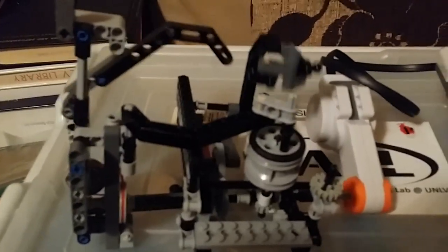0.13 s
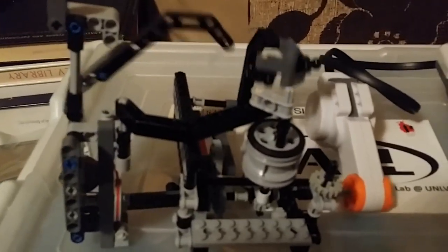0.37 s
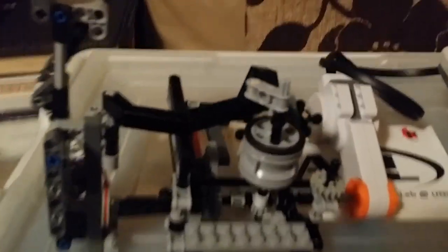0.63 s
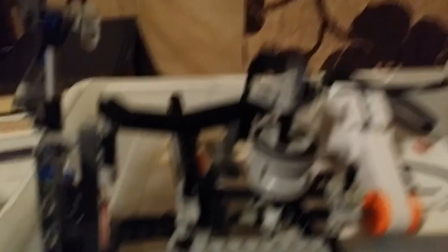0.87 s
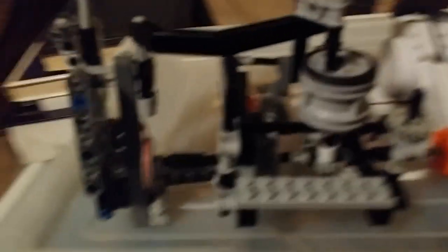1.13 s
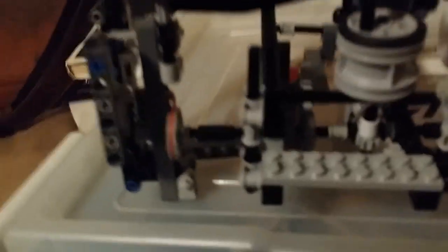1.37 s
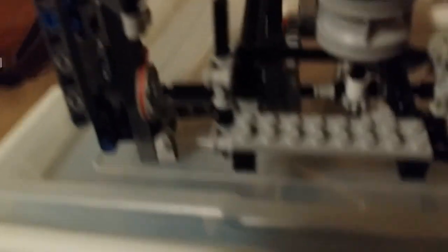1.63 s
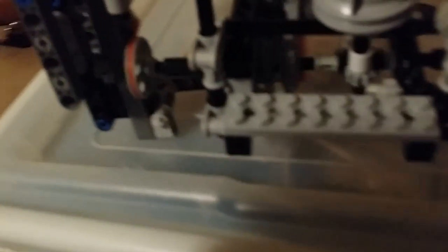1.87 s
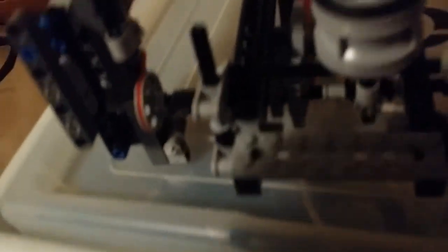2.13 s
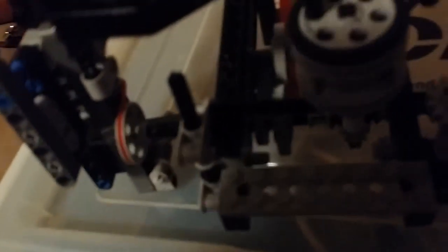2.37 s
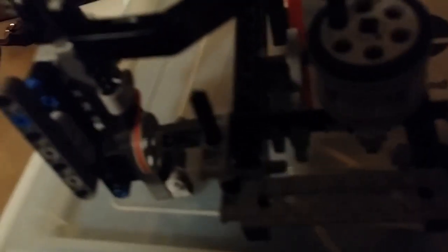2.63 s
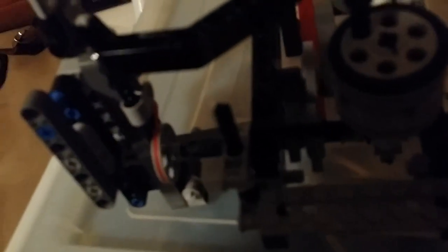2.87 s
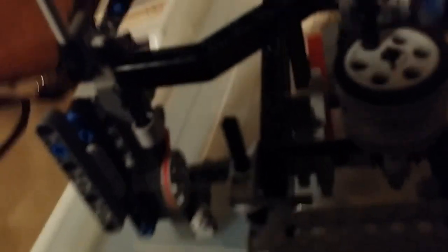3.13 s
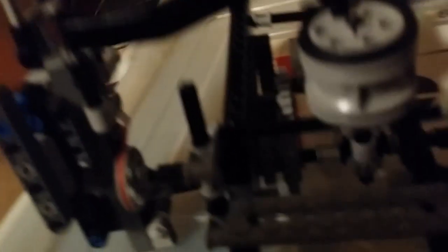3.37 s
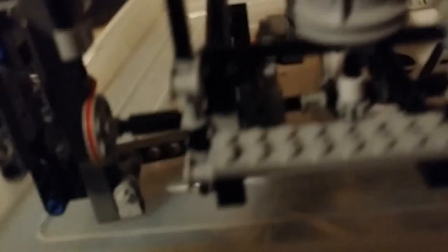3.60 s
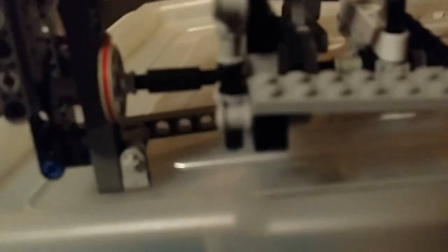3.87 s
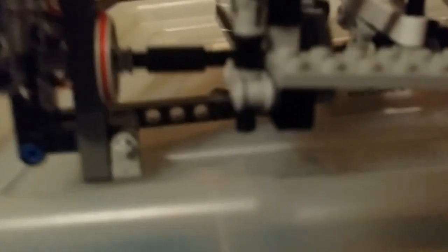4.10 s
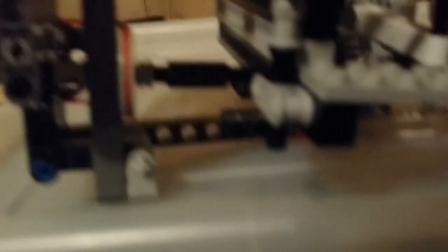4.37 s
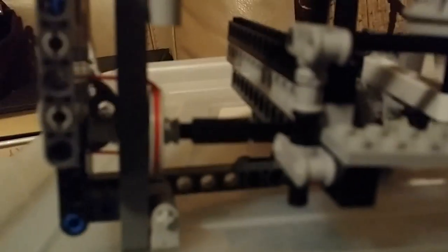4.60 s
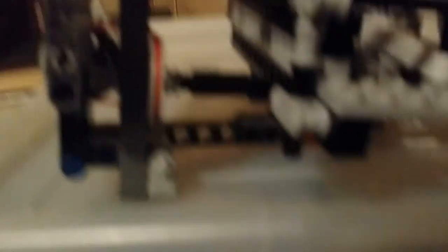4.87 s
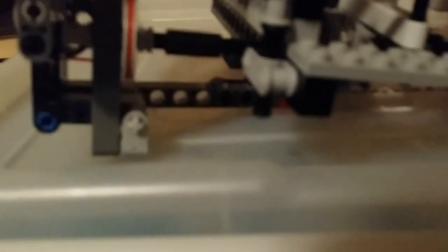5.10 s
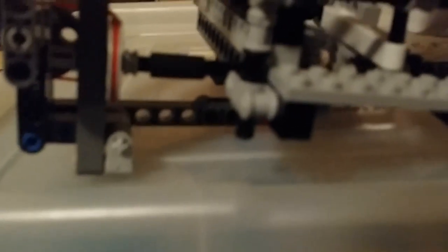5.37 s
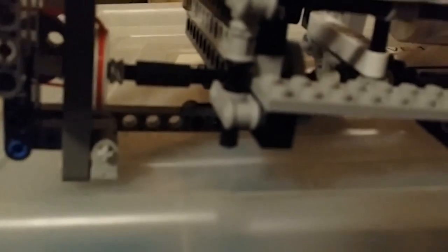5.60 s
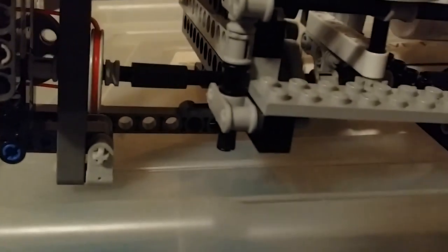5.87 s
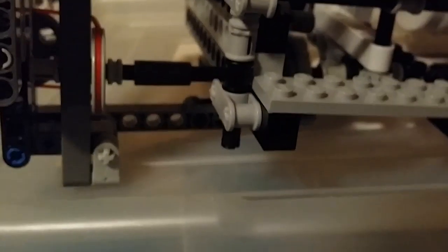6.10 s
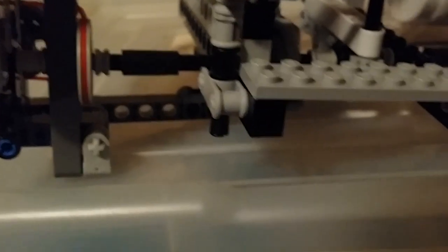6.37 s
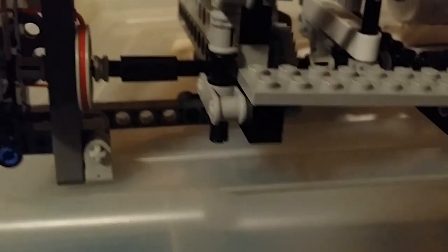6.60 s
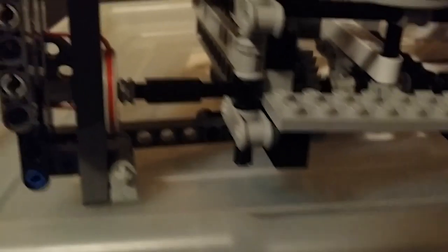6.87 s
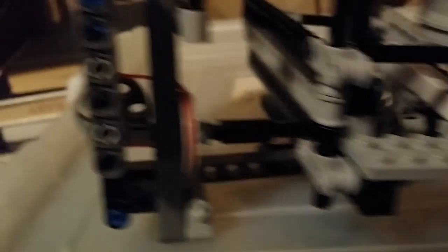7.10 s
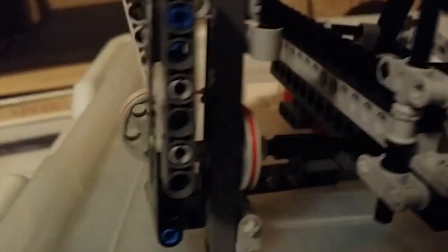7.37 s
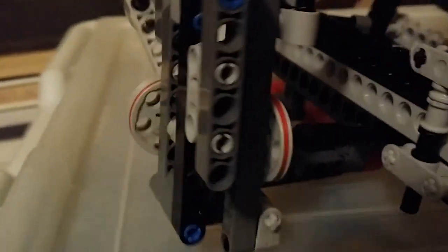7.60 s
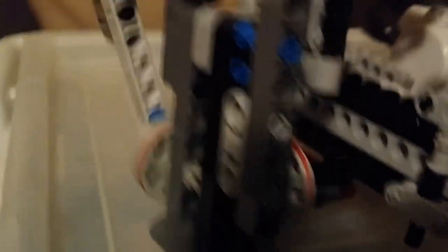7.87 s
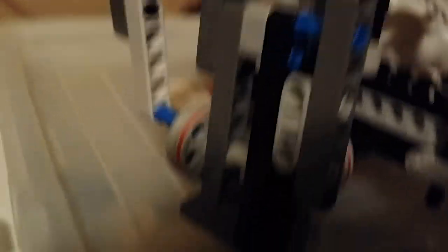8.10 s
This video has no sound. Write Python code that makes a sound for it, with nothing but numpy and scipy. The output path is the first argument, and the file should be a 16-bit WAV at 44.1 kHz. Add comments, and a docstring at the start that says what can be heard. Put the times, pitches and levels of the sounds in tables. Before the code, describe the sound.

Continuous buzzing whir of toy gears, rough and treble-rich, over faint steady hum and low rumble. The speed wobbles down and recovers several times a second at most, never stopping. Soft hollow taps of plastic on plastic rattle irregularly underneath, favouring the right. Close, dry stereo from a moving hand-held microphone, with two early handling thumps and one louder one late.

```python
"""A small electric motor drives a plastic gear train in a plastic tub: tooth-mesh tones and sliding hiss.
A ten-tooth pinion meshes with a thirty-tooth wheel; load sags the speed and the loose frame knocks on the tub.
As the hand-held stereo microphone moves round the toy, each port hears another colour.
Steady hum tones and a low rumble lie beneath; a finger taps a port three times."""
import sys
import numpy as np
from scipy import signal
from scipy.fft import rfft, irfft
from scipy.io import wavfile
from scipy.ndimage import uniform_filter1d

SR = 44100
rng = np.random.default_rng(int(sys.argv[2]) if len(sys.argv) > 2 else 0)


def volts(x):
    """Linear amplitude factor 10**(x/20) for a level x in dB, scalar or array-like."""
    e = np.asarray(x, float) / 20
    return 10 ** e


def digitize_waveform(pressure):
    """Quantize a signal to 16-bit integers and store it at the path in sys.argv[1].

    Rows of a 2-D input are taken as channels; values are limited to [-1, 1].
    """
    field = np.atleast_2d(pressure).T
    bounded = np.clip(field, -1, 1)
    quanta = np.round(bounded * 32767).astype(np.int16)
    wavfile.write(sys.argv[1], SR, quanta)


N = 362943
T = np.arange(N) / SR
PINION_TEETH, WHEEL_TEETH = 10, 30
USUAL_MESH_HZ = 565


def evened(x):
    """Scales to rms 1."""
    return x / np.sqrt(np.mean(x ** 2) + 1e-20)


def add(mix, start_s, sound):
    """Mixes a sound in at start_s, cut at the end of the mix."""
    part = mix[:, round(start_s * SR):][:, :sound.shape[1]]
    part += sound[:, :part.shape[1]]


def partner(a, b, same):
    """Noise that shares correlation `same` with a; the rest comes from b."""
    return same * a + np.sqrt(1 - same ** 2) * b


def slow(hz, count):
    """Rows of complex low-passed noise (corner hz), one value every 64 samples."""
    a, b = rng.standard_normal((N // 64 + 2, count, 2)).T
    r = np.exp(-2 * np.pi * hz * 64 / SR)
    return signal.lfilter([np.sqrt(1 - r * r)], [1, -r], (a + 1j * b) / np.sqrt(2))


# motor pace between snags: (time [s], tooth meshes [1/s])
FREE_PACE = [(0.0, 601.3), (0.4, 596.5), (1.2, 582.3), (2.4, 584.6), (3.4, 581.2), (4.5, 579.7),
             (5.6, 586.4), (6.3, 595.5), (7.3, 585.9), (8.23, 597.5)]
# linkage snags drag the motor down: (time [s], meshes lost [1/s], Gaussian width [s])
LINKAGE_SNAGS = [(0.043, 28.4, 0.118), (0.868, 23.2, 0.157), (1.305, 11.5, 0.085), (1.708, 30.6, 0.13),
                 (2.188, 34.6, 0.16), (2.542, 32.7, 0.092), (2.848, 22.4, 0.16), (3.099, 20.2, 0.071),
                 (3.469, 21.2, 0.109), (3.753, 10.8, 0.038), (3.922, 16.4, 0.16), (4.264, 19.3, 0.16),
                 (4.772, 32.4, 0.089), (5.068, 51.0, 0.096), (5.303, 36.0, 0.16), (5.691, 24.0, 0.087),
                 (5.98, 31.4, 0.1), (6.496, 12.1, 0.072), (6.811, 22.3, 0.132), (7.713, 37.6, 0.133),
                 (8.137, 34.3, 0.16)]


def mesh_rate(t):
    """Tooth meshes a second: the free pace less a smooth dip at each snag."""
    dips = sum(lost * np.exp(-.5 * ((t - s) / width_s) ** 2) for s, lost, width_s in LINKAGE_SNAGS)
    return np.interp(t, *np.transpose(FREE_PACE)) - dips


def meshes():
    """Count of tooth meshes so far: the mesh rate integrated."""
    return np.cumsum(np.interp(T, T[::64], mesh_rate(T[::64]))) / SR


# mesh harmonics: (multiple of the mesh rate [1], tone over the hiss around it [dB])
TONE_OVER_HISS = [(1, 3), (2, 8), (3, 9), (4, 4), (5, 2.5), (6, -.5), (7, 13), (8, 3), (9, 11), (10, 0),
                  (11, 3), (12, 2), (13, 0), (14, 4.5), (15, -1), (16, 0), (18, -1.5), (27, -4)]


def tone_share(k):
    """Share of the power near mesh multiple k that is tone."""
    return 1 / (1 + volts(-2 * np.interp(k, *np.transpose(TONE_OVER_HISS))))


# uneven wheel: (lobes a turn [1], share of the timing error [1])
WHEEL_LOBES = [(1, 1), (2, .45), (4, .12)]


def teeth(lash, wheel_lag, flutter, pinion, wheel, smear_turns):
    """Mesh harmonics: backlash and wheel lobes shift the timing, tooth errors add sidebands, smear blunts blows."""
    turn = 2 * np.pi * meshes()
    coarse = np.r_[turn[::64], turn[-1], turn[-1]][:N // 64 + 2]
    lag = lash * uniform_filter1d(slow(8.9, count=1)[0].real, size=20)  # in meshes
    lag += sum(wheel_lag * part * np.sin(n * coarse / WHEEL_TEETH + n) for n, part in WHEEL_LOBES)

    k = np.arange(1, 28)[:, None]
    errors = rng.standard_normal((len(k), 2, 6, 2)) @ [1, 1j] / np.sqrt(2)
    side = np.array([-3, -2, -1, 1, 2, 3])[:, None]
    pinion_sides = np.exp(1j * side * coarse / PINION_TEETH) / abs(side) ** .5
    wheel_sides = np.exp(1j * side * coarse / WHEEL_TEETH) / abs(side)
    repeats = pinion * errors[:, 0] @ pinion_sides + wheel * errors[:, 1] @ wheel_sides

    share = tone_share(k)
    uneven = 2.4 * np.sqrt(1 - share)  # the clearest tones waver least
    shape = 1 + uneven * (repeats + flutter * slow(16.3, count=len(k)))
    shape = shape * np.exp(2j * np.pi * (k * lag + smear_turns * rng.random(k.shape)))
    shape *= np.sqrt(share)

    at, step = np.arange(len(coarse)) * 64, np.exp(1j * turn)
    carrier, out = np.ones(N), np.zeros(N)
    for row in shape:
        carrier = carrier * step  # next harmonic
        out += (carrier * np.interp(np.arange(N), at, row)).real
    return out * 2 * np.sqrt(USUAL_MESH_HZ / SR)  # a full tone has the power of unit noise in its band


# microphone dwells: (from [s], to [s], left port nearer by [ms], left-right [dB])
DWELLS = [(0, .97, -0.027, -1.4), (1.09, 1.65, 0.036, 1.4), (1.77, 2.68, -0.013, 0),
          (2.8, 3.71, -0.041, -1.1), (3.83, 5.14, -0.051, -1.2), (5.26, 5.77, .002, -1),
          (5.89, 7.14, -0.0049, -1.6), (7.26, 7.48, -0.16, -3.1), (7.6, 8.3, -0.082, -0.7)]
GLIDE_S = .25


def at_place(values, s):
    """Reads one value a dwell at times s, gliding while the microphone moves."""
    steps = np.interp(s, np.ravel([p[:2] for p in DWELLS]), np.repeat(values, repeats=2))
    return uniform_filter1d(steps, size=round(GLIDE_S / (s[1] - s[0])), mode="nearest")


# housing colour before the overall level: (frequency [Hz], left [dB], right [dB], left port leads by [rad])
HOUSING_COLOUR = [(610, -43, -42, -1.87), (1168, -39.5, -39.5, 0.25), (1670, -33, -31, 0.74),
                  (2140, -32, -30, 1.1), (3020, -32, -37.5, 1.06), (3360, -37.5, -39, 2),
                  (3865, -29.5, -34.5, 0.5), (4510, -29.5, -31.5, 3.5), (5280, -27, -28.5, 3),
                  (5230, -38.5, -33, 1.3), (6450, -30.5, -35, 1.37), (6820, -35, -28, 4.5),
                  (7570, -52, -27, -1.9), (8420, -48.5, -24.5, 3), (8560, -49, -28.5, 7.5),
                  (8520, -43, -33.5, 5), (10370, -63, -38.5, 2.5), (10700, -49, -35.5, 5),
                  (15100, -50, -45, 5)]
# per dwell, left port: (floor echo late [ms], wall echo late [ms], treble tilt by frame shading [dB/kHz])
LEFT_PATHS = [(0.331, 0.262, 1.1), (0.33, 0.32, 1.35), (0.352, 0.29, 1.6), (0.389, 0.414, 1.4),
              (0.5, 0.15, 1.4), (0.538, 0.577, 0.7), (0.47, 0.46, 1.1), (0.5, 0.49, 1.1),
              (0.638, 0.644, 0.44)]
# per dwell, right port: (floor echo late [ms], wall echo late [ms], treble tilt by frame shading [dB/kHz])
RIGHT_PATHS = [(0.1635, 0.309, 0.72), (0.3, 0.27, 0.16), (0.392, 0.407, -0.32), (0.369, 0.387, -0.081),
               (0.485, 0.477, -0.038), (0.299, 0.3, -0.14), (0.445, 0.42, 0.22), (0.18, 0.342, 0.33),
               (0.13, 0.793, -1.34)]
FLOOR_ECHO_GAIN, WALL_ECHO_GAIN = -0.44, 0.26
DIFFUSE_HZ = 10140  # above it sound comes from all round: echoes and shading fade


def paths(hz, s):
    """Complex gain from gearbox to each port: housing colour, two tub echoes, shading, gap between ports."""
    f, left_db, right_db, lead_rad = np.transpose(HOUSING_COLOUR)
    nearer_ms, pan_db = (at_place(c, s) for c in np.transpose(DWELLS)[2:])
    lead = np.interp(hz, f, np.exp(1j * lead_rad))[:, None]
    hz_column = hz[:, None]

    def late(ms):
        """Phase of a delay."""
        return np.exp(-2j * np.pi * hz_column * ms / 1000)

    lead = lead / (abs(lead) + 1e-9) * late(-nearer_ms)
    aimed = 1 / (1 + (hz_column / DIFFUSE_HZ) ** 8)
    ports = ((left_db, LEFT_PATHS, lead * volts(pan_db / 2)),
             (right_db, RIGHT_PATHS, volts(-pan_db / 2)))
    out = []
    for db, echoes, side in ports:
        floor_ms, wall_ms, tilt = (at_place(c, s) for c in np.transpose(echoes))
        shade_db = aimed * tilt * (hz_column / 1000 - 4.5)
        colour = volts(np.interp(hz, f, db)[:, None] + shade_db)
        echo = FLOOR_ECHO_GAIN * late(floor_ms) + WALL_ECHO_GAIN * late(wall_ms)
        out.append(side * colour * (1 + aimed * echo))
    return np.array(out)


# gearbox loudness as the hand sways the microphone: (time [s], level [dB])
HAND_SWAY = [(0.0, -0.5), (.96, 0.2), (1.24, 0), (2.4, 2.1), (3.45, 1.4), (3.75, -0.1), (4.72, 1),
             (4.95, -0.3), (6.0, 0.57), (6.83, 0.4), (7.17, 1), (7.54, 0.76), (8.23, 1.4)]


def gearbox(same=0.15, wheel_db=0.14, lobe_db=-0.48, shaft_db=0.5, drift_db=2.5, hiss_drift_db=2.5, level_db=13.5):
    """Tooth mesh and sliding hiss ring through the housing and reach each port by its own path."""
    turn = 2 * np.pi * meshes()
    hiss = rng.standard_normal((2, N)) * (1 + .5 * np.cos(turn))  # swells once a mesh as teeth slide
    wobble_db = wheel_db * np.cos(turn / WHEEL_TEETH) + lobe_db * np.cos(2 * turn / WHEEL_TEETH)
    wobble_db += shaft_db * np.cos(turn / PINION_TEETH)  # gears run off centre
    tones = teeth(lash=.04, wheel_lag=.016, flutter=.3, pinion=.14, wheel=.17, smear_turns=.55)

    hz, s, z = signal.stft(np.vstack([tones, hiss]), SR, nperseg=1024, noverlap=768)
    sliding = np.array([z[1], partner(z[1], z[2], same)])
    sliding *= np.sqrt(1 - tone_share(hz / USUAL_MESH_HZ))[:, None]
    drift = rng.standard_normal((2, len(s), len(hz))).transpose(0, 2, 1)
    drift = uniform_filter1d(drift, size=14, axis=1)
    drift = evened(uniform_filter1d(drift, size=30, axis=2))  # colour drifts in patches

    loud_db = level_db + np.interp(s, *np.transpose(HAND_SWAY))
    low_cut = np.clip(hz / 500, 0, 1)[:, None] ** 4
    source = z[0] * volts(drift_db * drift) + sliding * volts(hiss_drift_db * drift[:, ::-1])
    field = paths(hz, s) * source * low_cut * volts(loud_db)
    out = signal.istft(field, nperseg=1024, noverlap=768)[1][:, :N]
    treble = signal.sosfilt(signal.butter(2, 6000, "high", fs=SR, output="sos"), out)
    return out * volts(0.98 * wobble_db) + treble * (volts(wobble_db) - 1)  # wobble shows most in the treble


# motor hum: (multiple of the pinion shaft speed [1], left rms [dB], right rms [dB])
HUM_TONES = [(6.09, -61, -59.5), (17.04, -71, -49), (21, -82, -47), (21.8, -84, -82), (29.25, -50, -45),
             (34.7, -44.5, -75), (37.05, -52, -45.5)]


def hum():
    """Tones of steady level at multiples of the pinion shaft speed."""
    turn = 2 * np.pi * meshes() / PINION_TEETH
    out = np.zeros((2, N))
    for k, left_db, right_db in HUM_TONES:
        tone = np.sqrt(2) * np.cos(k * turn + 2 * np.pi * rng.random())
        out += volts([[left_db], [right_db]]) * tone
    return out


# rumble spectrum before scaling to level: (frequency [Hz], relative density [dB per Hz])
RUMBLE_SPECTRUM = [(30, 4), (60, 2.5), (140, -5), (270, 3), (420, -12.5), (800, -53), (1400, 1),
                   (3000, -13)]


def rumble(same=0.93, level_db=-40):
    """Tub and room carry a low, nearly central rumble: shaped noise, largely shared by the ports."""
    a, b = rng.standard_normal((N, 2)).T
    hz, (f, db) = np.fft.rfftfreq(N, 1 / SR), np.transpose(RUMBLE_SPECTRUM)
    colour = volts(np.interp(np.log(hz + 1), np.log(f), db))
    shaped = irfft(rfft([a, partner(a, b, same)]) * colour, N)
    return volts(level_db) * evened(shaped) * volts([[-1.5], [1.5]])


# tub floor modes: (nominal frequency [Hz], struck near rim [dB], struck in middle [dB], t60 [s])
FLOOR_MODES = [(117, -13, -9, 0.055), (192, -17.5, -3.6, 0.063), (277, -4.7, -33, 0.06),
               (470, -3, -7, 0.02), (686, -12, 2, 0.017), (925, -2, -5.5, 0.014)]
UNEVEN_DB, DETUNE = 3.5, .05  # no two knocks land or load the floor alike


def knock(db, middle, buzz_db, mesh_hz, chance, buzz_s=0.042, rise_s=0.0038, late_s=0.00078):
    """Floor modes ring dry, by place struck, with a short mesh-rate buzz while the gears shake the floor."""
    t = np.maximum(np.arange(SR // 8) / SR - late_s, 0)
    middle = np.clip(middle, 0, 1)
    ring = np.zeros(len(t))
    for (f, rim_db, mid_db, t60_s), (a, b) in zip(FLOOR_MODES, chance):
        struck = (1 - middle) * volts(rim_db) + middle * volts(mid_db)
        decay = volts(db + UNEVEN_DB * a - 60 * t / t60_s)
        ring += struck * decay * np.sin(2 * np.pi * f * (1 + DETUNE * b) * t)
    buzz = volts(buzz_db) * np.sin(2 * np.pi * mesh_hz * t) * np.sin(np.pi * np.minimum(t / buzz_s, 1))
    return (ring * (1 - np.exp(-t / rise_s)) + buzz) * volts([[1.], [5.]])


# clear knocks of frame on tub: (time [s], level before mode gains [dB], nearness to mid-floor [0-1])
CLEAR_KNOCKS = [(0.901, -30.5, 1), (1.616, -21.5, 0.2), (1.71, -23.5, 0.35), (2.01, -20.5, 0.6),
                (2.044, -19, 0.3), (2.057, -22, 0.1), (2.08, -28, .05), (2.152, -18.5, 0.2),
                (2.225, -18, 0.67), (2.375, -26, .1), (2.481, -26, 0), (2.827, -25.5, 0.2),
                (2.859, -27, 0.3), (2.888, -17.5, .45), (3.046, -24, 0.25), (3.121, -21, 0.53),
                (3.813, -26.5, .15), (3.855, -22.5, 0.5), (4.102, -23.5, 0.2), (4.162, -19.5, 0),
                (4.722, -23, 0), (4.768, -20, 0.07), (4.797, -19, 0.1), (4.972, -21.5, 0.02),
                (5.015, -23, 0), (5.104, -24.5, .3), (5.403, -20, 0.07), (5.599, -22, 0.25),
                (5.851, -28, 0.2), (6.068, -23, 0), (7.701, -32, 0.7), (8.179, -38, .95)]


def knocks(small_per_s=30, small_db=-48, spread_db=3.0, buzz_db=-43.5, small_buzz_db=-15):
    """The loose frame knocks on the tub: clear knocks at set times, many small ones at random."""
    mix, chance = np.zeros((2, N)), rng.standard_normal((500, len(FLOOR_MODES), 2))
    for (s, db, middle), c in zip(CLEAR_KNOCKS, chance):
        add(mix, s, knock(db, middle, buzz_db, mesh_rate(s), c))
    small = rng.random((400, 3))[:round(small_per_s * N / SR)]
    for (u, v, w), c in zip(small, chance[::-1]):
        s, db = u * N / SR, small_db - spread_db * np.log(v)
        add(mix, s, knock(db, w ** 2, db + small_buzz_db, mesh_rate(s), c))  # small buzz is set below its knock
    return mix


# finger taps on one port: (time [s], level before the low cut [dB], left-right [dB])
FINGER_TAPS = [(0.583, -14, 35), (1.2190, -9.5, -34), (6.2614, 0, 40)]


def taps(rise_s=0.000094, release_s=0.0043):
    """A finger presses air into one port, and it leaks away."""
    mix, t = np.zeros((2, N)), np.arange(SR // 10) / SR
    push = (1 - np.exp(-t / rise_s)) * np.exp(-t / release_s)
    for s, db, pan_db in FINGER_TAPS:
        add(mix, s, volts(db) * push * volts([[min(pan_db, 0)], [min(-pan_db, 0)]]))
    return mix


def scene():
    """Everything that reaches the two ports."""
    return gearbox() + hum() + rumble() + knocks() + taps()


def top_cut(x):
    """Nothing passes above the cut-off."""
    return signal.sosfilt(signal.butter(12, 15910, fs=SR, output="sos"), x)


def record(dry, left_hz=75, right_hz=85):
    """A steep low cut on each port rings after each tap."""
    cut = []
    for hz, port in zip((left_hz, right_hz), dry):
        cut.append(signal.sosfilt(signal.butter(4, hz, "high", fs=SR, output="sos"), port))
    return top_cut(np.array(cut))


dry = scene()
out = record(dry)
digitize_waveform(out)
```